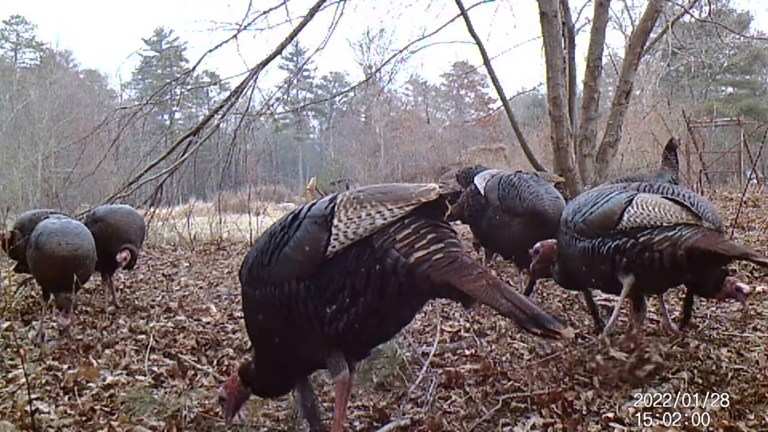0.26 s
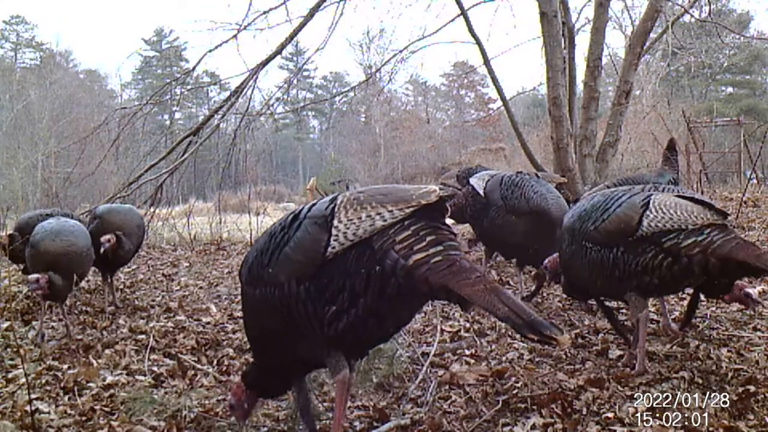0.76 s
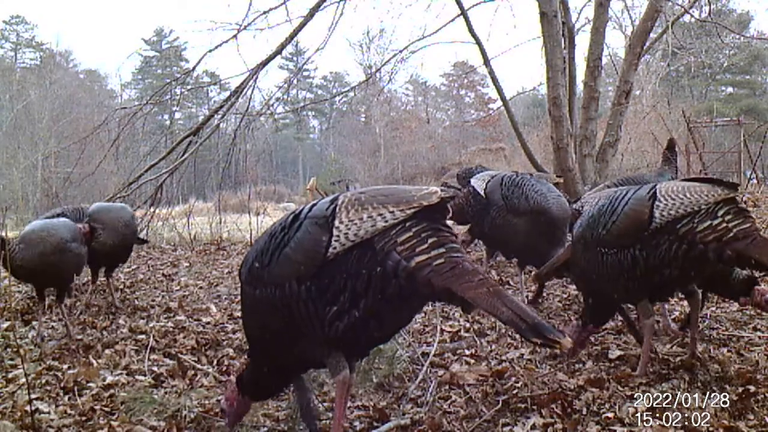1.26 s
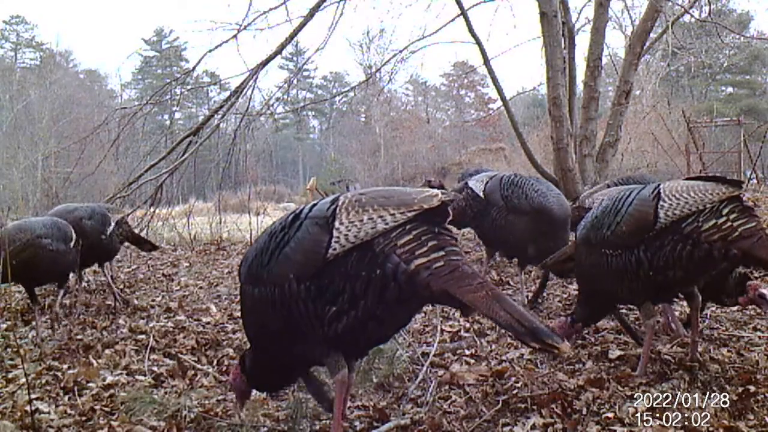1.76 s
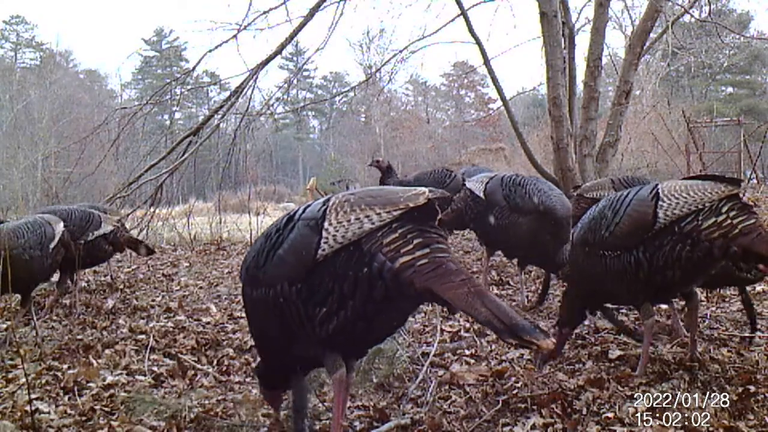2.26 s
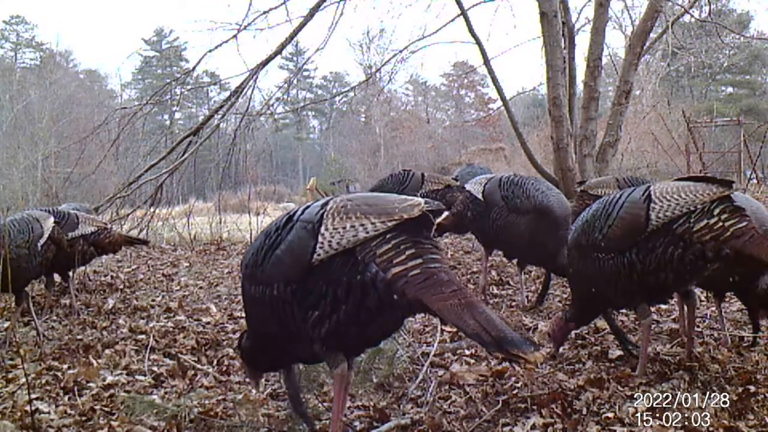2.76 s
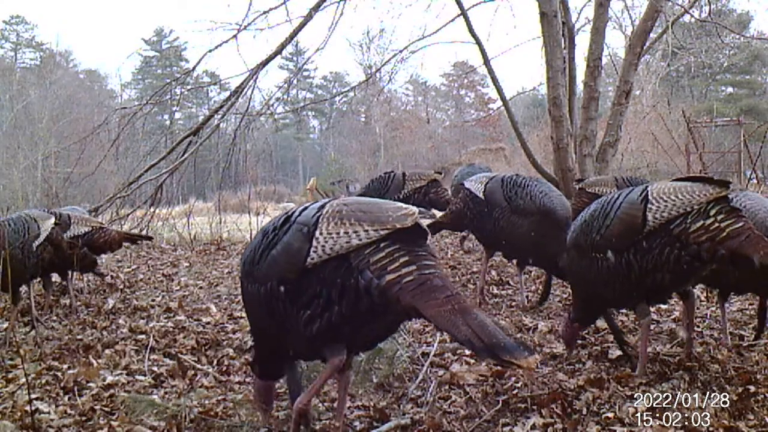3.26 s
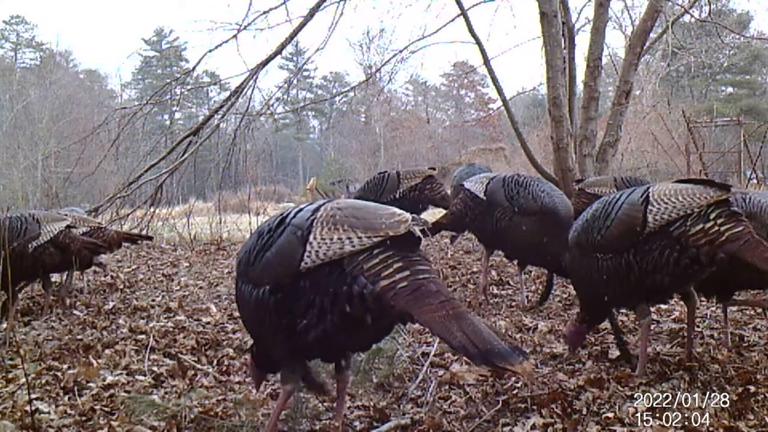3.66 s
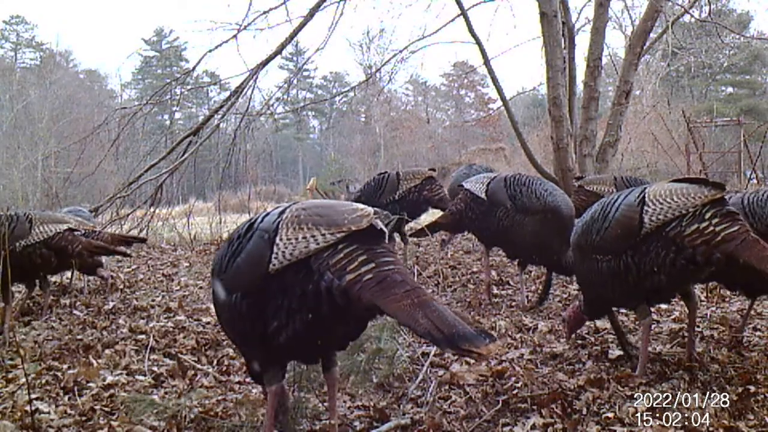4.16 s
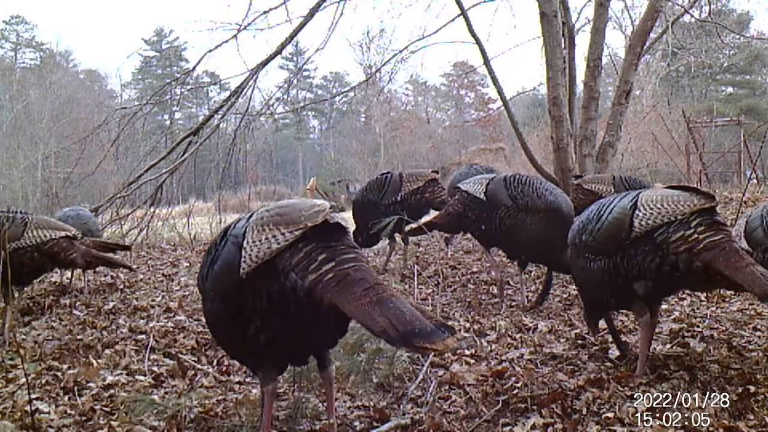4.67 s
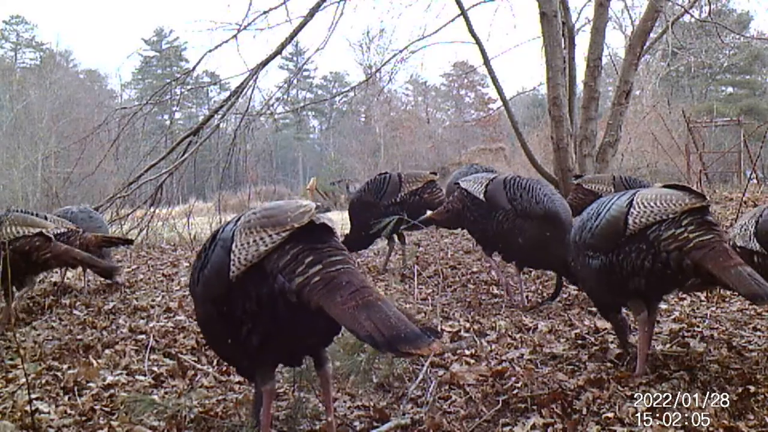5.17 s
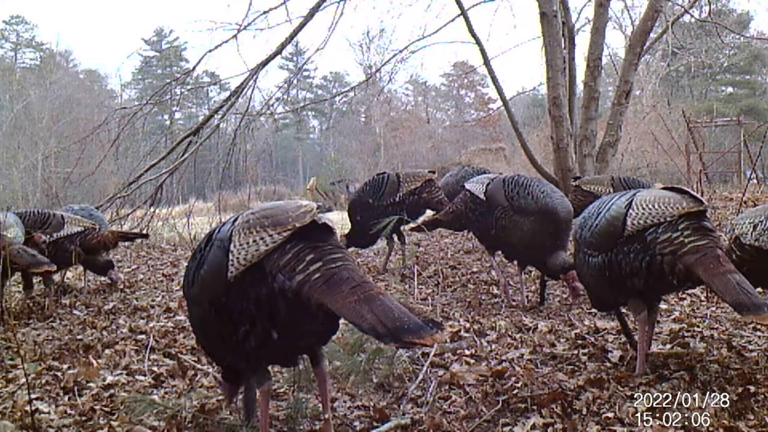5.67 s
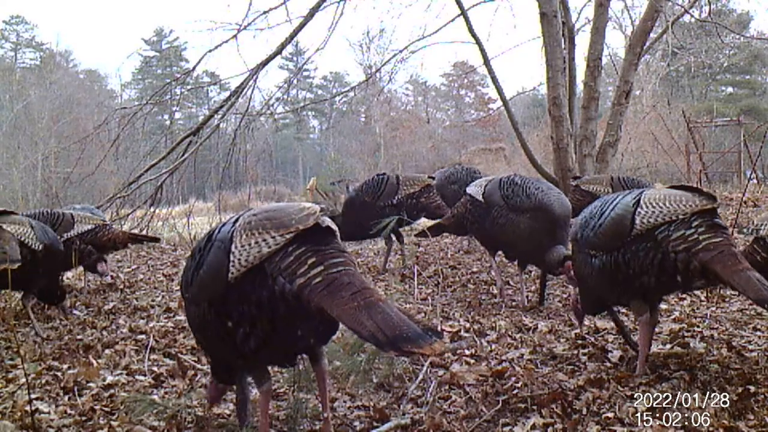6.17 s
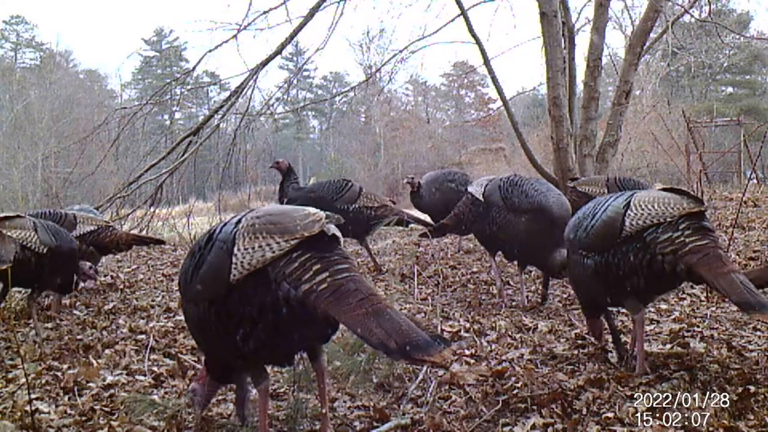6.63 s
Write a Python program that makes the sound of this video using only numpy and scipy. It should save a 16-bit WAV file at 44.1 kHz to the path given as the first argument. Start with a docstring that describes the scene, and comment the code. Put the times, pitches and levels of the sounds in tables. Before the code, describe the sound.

Wild turkeys rake and peck through dry leaves, crisp cracks and one sharp early snap over boomy rumble, hiss and faint whine.

```python
"""Wild turkeys scratch and peck in dry leaves near a small mono camera with a boomy, hissy microphone.
From the start, bursts of random cracks rake the litter; right away one ringing leaf snap overloads the camera.
Until about 2.5 s a low wavering tone booms now and then; rumble, hiss and faint whining tones run throughout.
At about four seconds a wide layer joins: faint hiss, then a hollow drone of resonated noise (the same in
both ears) and a narrow, whistling rustle of opposite sign in the two ears around a nasal centre."""
import sys
import numpy as np
from scipy import signal
from scipy.fft import rfft, irfft
from scipy.io import wavfile
from scipy.ndimage import uniform_filter1d

SR = 44100
rng = np.random.default_rng(int(sys.argv[2]) if len(sys.argv) > 2 else 0)


def bounce(signal):
    """Save signal as a 16-bit WAV file at the path given by the first command-line argument."""
    frames = np.transpose(np.atleast_2d(signal))
    limited = np.clip(frames, -1, 1)
    pcm = np.round(limited * 32767).astype(np.int16)
    wavfile.write(sys.argv[1], SR, pcm)


N = 304290

# faint steady electronic tones: f/Hz, level/dB
WHINE = [(8269, -101), (9647, -105), (11025, -91.5), (12403, -104)]
# colour of outdoor rumble and microphone hiss: f/Hz, relative level/dB
AIR_COLOUR = [(10, -9), (22, -5), (48, 3), (65, -1.5), (100, -2.5), (160, -7.5), (250, -14), (285, -15.5),
              (305, -10.5), (330, -16), (400, -20.5), (700, -22), (1200, -26), (2500, -34), (4700, -27.5),
              (5600, -46.5), (6300, -51)]
# slow swell of rumble and hiss: t/s, level/dB before AIR_LIFT_DB is added
AIR_SWELL = [(0.0, -41.5), (0.6, -43), (2.7, -44), (5.0, -42.5), (6.9, -42)]
# a low boom swells and fades: start t/s, hold t/s, f/Hz, level/dB
BOOM = [(0, 0.25, 86, -44), (.36, .05, 85, -36.5), (.48, 0.085, 83, -31), (.68, 0.17, 80, -46),
        (.93, .05, 84.7, -34.5), (1.15, .3, 85.4, -43), (1.65, .45, 92, -46.5), (2.22, .05, 85.4, -45),
        (2.5, .06, 94, -40)]
# hollow resonances of the drone: f/Hz, width f/Hz, relative level/dB
DRONE_MODES = [(551, 210, -3.5), (618.5, 122, 4), (694, 162, 4), (800, 340, -14)]
# the drone surges briefly: start t/s, hold t/s, level/dB
DRONE_SURGES = [(4.052, 0.011, -39), (4.76, 0.033, -45), (5.385, 0.012, -36), (5.445, .015, -42)]
# strokes of the wide rustle: start t/s, hold t/s, level of the sides/dB, level of the nasal centre/dB
WIDE_STROKES = [(4.48, 0.057, -52, -56), (4.775, 0.092, -49, -42.5), (5.08, 0.14, -40.5, -43.5),
                (5.3, 0.12, -45, -48), (5.5, 0.12, -39.5, -47), (5.83, .04, -38, -47),
                (6.17, .04, -55, -52), (6.35, 0.013, -57, -47), (6.49, 0.023, -41, -45.5),
                (6.6, 0.046, -46, -49.5), (6.81, 0.017, -43, -49)]
# loudest snaps of the wide rustle: t/s, peak level/dB
WIDE_SNAPS = [(4.127, -28), (4.345, -27.8), (4.667, -32), (4.795, -32), (5.233, -25), (5.493, -32),
              (5.528, -32), (5.667, -31), (5.82, -31.7), (5.873, -34), (5.961, -29.3), (6.205, -32),
              (6.265, -35), (6.274, -32), (6.308, -31), (6.562, -33), (6.814, -23)]
# narrow whistling colour of the sides: f/Hz, relative level/dB
WIDE_COLOUR = [(150, -58), (211, -34), (700, -28), (1180, -25), (1430, -25), (1860, -20), (2210, -19),
               (3520, -17.5), (4170, -8.5), (4450, -4), (4720, 4), (5000, -3.5), (5780, -17), (6150, -30),
               (8000, -60)]
# colour of the steady low wash in the sides: f/Hz, relative level/dB
WIDE_LOW_COLOUR = [(150, -40), (230, -7), (700, -1), (1200, 0.5), (1450, -12), (2000, -30)]
# nasal colour of the centre: f/Hz, relative level/dB
WIDE_CENTRE_COLOUR = [(1000, -16), (1350, -11.5), (1650, -6.5), (1950, 3.5), (2150, -9), (2500, -21),
                      (3000, -22)]
# feet raking the litter: start t/s, hold t/s, crisp level/dB, duller body against it/dB, dying away/dB per s
SCRATCHES = [(0.0, 0.061, -31, -0.5, 102), (0.047, 0.033, -22.5, -10, 106.5), (0.13, 0.035, -34, -15, 70.5),
             (0.316, 0.069, -35.5, -7, 100), (0.405, 0.074, -32, -9, 120), (.55, 0.09, -38, -9, 400),
             (0.717, 0.073, -42, -6.5, 98.5), (0.861, .17, -34.5, -9, 200), (1.128, 0.034, -40, -8.5, 100),
             (1.25, 0.03, -41.5, -9, 70), (1.443, 0.022, -43, -9, 298), (1.596, 0.21, -52.5, -12, 100),
             (1.904, 0.039, -41, -11, 70), (2.086, 0.11, -46, -8, 58), (2.308, 0.013, -43, -5, 498),
             (2.367, 0.034, -40.5, -6, 250), (2.6, 0.11, -49, -8, 58), (3.29, 0.046, -44.5, -6.5, 150),
             (3.722, 0.1, -47, -13, 60), (4.037, 0.19, -45, -8, 30), (4.332, .02, -44, -7, 80),
             (4.474, 0.044, -41.5, -8, 60), (4.783, 0.15, -35, -9, 150), (5.0, .15, -40.5, -9, 100),
             (5.189, .1, -34, -11.5, 60), (5.493, 0.085, -35, -9.5, 55), (5.817, .08, -40.5, -11.5, 50),
             (6.145, .08, -38.5, -10.5, 35), (6.494, 0.032, -38, -6.5, 200), (6.56, 0.29, -45, -6.5, 16)]
# crisp top of the leaves: f/Hz, relative level/dB
CRISP_COLOUR = [(2200, -21.5), (2900, -6.5), (3500, -2), (4200, 0), (4900, 5), (5400, -1), (5800, -10.5),
                (6300, -37.5)]
# duller body of the raked litter: f/Hz, relative level/dB
RAKE_BODY_COLOUR = [(500, -8), (900, -21.5), (1300, -4.5), (1600, -5), (2000, -1.5), (2400, 0),
                    (2900, -4.5), (3600, -37)]
# duller body of single breaks: f/Hz, relative level/dB
SNAP_BODY_COLOUR = [(300, -24), (600, -3.5), (1000, -4.5), (1600, 1.5), (2200, -6.5), (2900, -11),
                    (3600, -25.5)]
# single leaves breaking: t/s, peak level/dB, body against the peak/dB, ring f/Hz
SNAPS = [(.0197, -10.5, -16, 4320), (.0549, -19, -9, 4800), (.0889, -13, -9, 4260), (.1006, -17, -26, 5000),
         (.124, -16.5, -9.5, 4690), (.15, -18, -13, 4130), (.2133, -30, -25, 4220),
         (.3286, -20.5, -22, 4690), (.339, -27, -20, 4350), (.362, -23, -16, 4590),
         (0.4695, -19, -23, 4240), (0.6246, -24, -27, 5040), (0.6405, -25, -10, 4800),
         (.7366, -26, -10, 4240), (.768, -26, -15, 4800), (.8254, -22, -32, 4960), (.858, -25, -20, 4600),
         (.9144, -24, -20, 4480), (1.1845, -30, 2, 4220), (1.3546, -27, -25, 4520), (1.456, -25, -21, 4440),
         (1.465, -33, -14, 4130), (1.53, -32, 3, 4750), (1.5364, -22.5, -30, 4200),
         (1.6366, -33, -13, 4800), (1.81, -28, -6, 5040), (1.8157, -29.5, -1, 4350),
         (1.879, -33, -17, 5020), (1.9238, -26, -14, 5080), (1.9935, -27, -11, 4960),
         (2.1188, -24, -26, 4600), (2.171, -30, -14, 5060), (2.23, -24, -13, 5000), (2.2394, -26, -8, 4130),
         (2.3206, -22, -13, 4930), (2.3556, -22, -17, 4500), (2.397, -21, -23, 4750),
         (2.4136, -23, -21, 4110), (2.4552, -36, -1, 3270), (2.5136, -22, -10, 4350),
         (2.5192, -22.5, -4.5, 4710), (2.6233, -30, -18, 4220), (2.6434, -27, -27, 4670),
         (2.8209, -30.5, -28, 4670), (2.85, -26.5, 0, 4650), (2.8573, -33, -2, 4690),
         (2.9664, -32, -6, 4570), (3.0354, -30, -6, 4290), (3.0836, -31, -26, 5040),
         (3.1006, -28, -25, 5200), (3.183, -30, -19, 4500), (3.358, -29, -9, 4910),
         (3.4834, -25, -25, 4590), (3.5138, -29.5, -3.5, 5210), (3.54, -23.5, -32, 4680),
         (3.5514, -25, -24, 5230), (3.635, -30, -18, 4800), (3.7506, -31.5, -23, 3700),
         (3.8094, -30, -8, 4760), (3.8165, -26.5, -10, 5040), (3.918, -29, -10, 4630),
         (4.022, -26, -21, 4660), (4.0346, -20.5, -27, 4480), (4.09, -31, -11, 4860),
         (4.1268, -27.5, -17, 5100), (4.3453, -30.5, -18, 5020), (4.4815, -29, -25, 5000),
         (4.8907, -25, -32, 5100), (5.1804, -26, -20, 4570), (5.2155, -27, -27, 4780),
         (5.2746, -17.5, -23, 4260), (5.335, -27, -8, 5000), (5.5352, -20.5, -17, 5170),
         (5.5642, -22, -13, 5000), (5.65, -24, -17, 4740), (5.8137, -26, -30, 4570),
         (5.843, -24.5, -15, 5000), (5.874, -26, -12, 5000), (5.9533, -27, -23, 4280),
         (5.997, -27.5, -20, 4740), (6.5025, -18, -15, 4650), (6.5068, -16, -25, 4330),
         (6.818, -24.5, -6, 4360)]
# the loudest break of all: t/s, level/dB
LOUDEST_BREAK = (.04862, -6.5)
# what the loudest break rings with: f/Hz, relative level/dB, t/s to fall by 60 dB
LOUDEST_MODES = [(1990, -9, .014), (2970, -11, .014), (4270, 0, .022), (5050, -2, .018)]

HISS_FROM_S, HISS_DB = 3.968, -61
AIR_LIFT_DB = 5
BOOM_RISE_DB_PER_S, BOOM_FALL_DB_PER_S, BOOM_WAVER_HZ = 196.5, 150, 2.4
DRONE_DB, DRONE_WAVER_DB = -44, 0.9
WIDE_FROM_S = 4.052  # drone and wide rustle begin
STROKE_RISE_DB_PER_S, SIDE_FALL_DB_PER_S, CENTRE_FALL_DB_PER_S = 302, 86, 134
SIDE_REST_DB, CENTRE_REST_DB = -48, -61.5  # between strokes
WIDE_SMALL_PER_S, WIDE_SMALL_DB = 9, -36  # lesser snaps: rate, middle peak level
WIDE_LOW_DB = -63.5
RAKE_RISE_DB_PER_S = 348.5
SHUFFLE_DB, SHUFFLE_BODY_DB = -49, -6.5  # the flock never stands quite still; body against crisp
SNAP_HZ, SNAP_SPREAD_HZ, SNAP_T60_S = 4800, 350, 0.013  # T60: time to fall by 60 dB
# lesser breaks: rate, level above the raking, its spread, body against the peak
SMALL_PER_S, SMALL_DB, SMALL_SPREAD_DB, SMALL_BODY_DB = 14, 9, 2.2, -17.5
TREBLE_LIMIT_HZ, FINAL_LIMIT_HZ = 6240, 13150
OVERLOAD, OFFSET = .64, .0612  # amplitudes; the offset comes after the overload


def gain_of(db):
    """Turns decibels into a plain multiplier."""
    return 10 ** (np.asarray(db) / 20)


def evened(x):
    """Scales a sound to an average (rms) strength of 1."""
    return x / np.sqrt(np.mean(x ** 2) + 1e-20)


def curve(rows, column=1):
    """Draws straight lines between the points in one column of a table, sample by sample."""
    return np.interp(np.arange(N) / SR, [r[0] for r in rows], [r[column] for r in rows])


def after(s):
    """Silent before s, fully open 2 ms later."""
    return np.clip((np.arange(N) / SR - s) * 500, 0, 1)


def swells(rows, rise, fall, rest_db, column=2):
    """Gain of overlapping gestures: each rises, holds and dies away; powers add over a resting level."""
    t = np.arange(0, N, 32) / SR
    power = gain_of(rest_db) ** 2
    for row, dying in zip(rows, fall * np.ones(len(rows))):
        start, hold = row[0], row[1]
        below_db = rise * np.maximum(start - t, 0) + dying * np.maximum(t - start - hold, 0)
        power = power + gain_of(row[column] - below_db) ** 2
    return np.interp(np.arange(N) / SR, t, np.sqrt(power))


def response(points, size=4096):
    """Makes a filter of energy 1 from a colour table, reacting as early as possible (minimum phase)."""
    f, db = np.transpose(points)
    hz = abs(np.fft.fftfreq(size, 1 / SR)) + 1
    log_gain = np.log(gain_of(np.interp(np.log(hz), np.log(f), np.maximum(db, -70))))
    spectrum = np.exp(np.conj(signal.hilbert(log_gain)))
    taps = np.fft.ifft(spectrum).real[:size // 2]
    return taps / np.linalg.norm(taps)


def coloured(x, points, size=4096):
    """Filters a sound to the colour in a table."""
    return signal.oaconvolve(x, response(points, size=size))[:N]


def low_pass(x, hz, size):
    """Removes what lies above hz, with a longer filter cutting more sharply."""
    taps = signal.firwin(size, hz, window=("kaiser", 10), fs=SR)
    return signal.oaconvolve(x, taps.reshape((1,) * (x.ndim - 1) + (-1,)), "same")


def resonate(x, hz, width):
    """Rings at hz: shifts that pitch down to zero, smooths, and shifts back."""
    turn = np.exp(2j * np.pi * np.cumsum(hz * np.ones(N)) / SR)
    r = np.exp(-np.pi * width / SR)
    return 2 * (turn * signal.lfilter([1 - r], [1, -r], x / turn)).real


def ring(hz, t60):
    """A tone that dies by 60 dB in t60 seconds, cut off after 1200 samples."""
    t = np.arange(1200) / SR
    return gain_of(-60 * t / t60) * np.sin(2 * np.pi * hz * t)


def crackle_bursts(per_s, spread_db, t60):
    """Strength over time of cracks of uneven size, struck at random and dying away."""
    size = gain_of(spread_db * np.minimum(rng.exponential(1, N), 4))
    struck = size * (rng.random(N) < per_s / SR)
    return evened(signal.lfilter([1], [1, -gain_of(-60 / (t60 * SR))], struck))


def crackle(per_s, spread_db, t60, smooth, shared, count=5):
    """Countless leaf cracks over a blur of far ones; each crack fills one band, some fill all."""
    octaves = np.log2(np.fft.rfftfreq(N, 1 / SR) / 1000 + 1e-9)
    place = np.clip(octaves * 1.618, 0, count - 1)
    broad = crackle_bursts(per_s, spread_db, t60)
    total = 0
    for k in range(count):
        band = np.cos(np.pi / 2 * np.clip(place - k, -1, 1))  # neighbours overlap, squares sum to 1
        strength = crackle_bursts(per_s, spread_db, t60) + shared * broad + smooth
        total = total + band * rfft(strength * rng.standard_normal(N))
    return evened(irfft(total, N))


def snap(s, peak_db, t60, taps, tick, rise_s):
    """One break: a tick and a spray of splinters that builds up quickly and dies."""
    t = np.arange(1200) / SR
    spray = rng.standard_normal(1200) * gain_of(-60 * t / t60) * (1 - np.exp(-t / rise_s))
    spray[round(rise_s * SR)] = tick
    sound = signal.fftconvolve(spray, taps)
    return round(s * SR), gain_of(peak_db) * sound / abs(sound).max()


def scattered(per_s, from_s=0):
    """Rows of chance for the lesser breaks: time, and three normal numbers."""
    times = from_s + np.cumsum(rng.exponential(1, (400, 1)), 0) / per_s
    return np.hstack([times, rng.standard_normal((400, 3))])[times[:, 0] < N / SR]


def add(mix, at, sound):
    """Adds a short sound to the mix, starting at a sample number."""
    part = mix[at:][:len(sound)]
    part += sound[:len(part)]


def electronics():
    """Faint steady tones, and the wide layer's hiss, unrelated left and right and without bass."""
    t = np.arange(N) / SR
    whine = sum(np.sqrt(2) * gain_of(db) * np.sin(2 * np.pi * hz * t) for hz, db in WHINE)
    hiss = rng.standard_normal((2, N))
    hiss -= low_pass(hiss, 170, size=1501)
    return whine + gain_of(HISS_DB) * after(HISS_FROM_S) * hiss


def air():
    """Outdoor rumble and microphone hiss: coloured noise with a slowly changing level."""
    noise = coloured(rng.standard_normal(N), AIR_COLOUR, size=16384)
    return gain_of(curve(AIR_SWELL) + AIR_LIFT_DB) * noise


def boom():
    """A low tone whose pitch glides and wavers while its level swells and fades."""
    waver = evened(uniform_filter1d(rng.standard_normal(N), 3000))
    hz = curve(BOOM, column=2) + BOOM_WAVER_HZ * waver
    tone = np.sqrt(2) * np.sin(2 * np.pi * np.cumsum(hz) / SR)
    return tone * swells(BOOM, BOOM_RISE_DB_PER_S, BOOM_FALL_DB_PER_S, -80, column=3)


def drone():
    """Wavering noise sent twice through each hollow resonance, with brief surges."""
    waver = evened(uniform_filter1d(rng.standard_normal(N), 1500))
    breathy = rng.standard_normal(N) * gain_of(DRONE_WAVER_DB * waver)
    hollow = 0
    for hz, width, db in DRONE_MODES:
        hollow = hollow + gain_of(db) * resonate(resonate(breathy, hz, width), hz, width)
    level = swells(DRONE_SURGES, 600, 370, DRONE_DB) * after(WIDE_FROM_S)
    return level * evened(hollow)


def wide_rustle():
    """Cracks through one narrow resonance, of opposite sign in the ears, around a centred nasal body."""
    opening = after(WIDE_FROM_S)
    side_level = swells(WIDE_STROKES, STROKE_RISE_DB_PER_S, SIDE_FALL_DB_PER_S, SIDE_REST_DB)
    centre_level = swells(WIDE_STROKES, STROKE_RISE_DB_PER_S, CENTRE_FALL_DB_PER_S, CENTRE_REST_DB, column=3)
    side = side_level * opening * coloured(crackle(600, 3.0, 0.0057, 1.0, .3), WIDE_COLOUR)
    side += gain_of(WIDE_LOW_DB) * opening * coloured(rng.standard_normal(N), WIDE_LOW_COLOUR)
    centre = centre_level * opening * coloured(crackle(540, 1.7, 0.015, 1.3, 0.26), WIDE_CENTRE_COLOUR)
    taps = response(WIDE_COLOUR, size=2048) + 0.07 * ring(4500, .012)[:1024]
    small = [(s, WIDE_SMALL_DB + 2.2 * a) for s, a, *_ in scattered(WIDE_SMALL_PER_S, WIDE_FROM_S)]
    for s, peak_db in [*WIDE_SNAPS, *small]:
        add(side, *snap(s, peak_db, .015, taps, 2.2, .0005))
    return low_pass(np.array([centre + side, centre - side]), TREBLE_LIMIT_HZ, size=301)


def raking(crisp_level):
    """Feet rake the litter: the same cracks feed its crisp top and its duller body."""
    cracks = crackle(900, 3.5, 0.0054, 0.83, 0.45)
    dull = [(s, hold, db + body_db) for s, hold, db, body_db, _ in SCRATCHES]
    dying = np.array(SCRATCHES)[:, -1]
    body_level = swells(dull, RAKE_RISE_DB_PER_S, dying, SHUFFLE_DB + SHUFFLE_BODY_DB)
    return crisp_level * coloured(cracks, CRISP_COLOUR) + body_level * coloured(cracks, RAKE_BODY_COLOUR)


def lesser_breaks(crisp_level):
    """Rows for small breaks at random times, each louder when the raking is louder."""
    rows = []
    for s, a, b, c in scattered(SMALL_PER_S):
        raking_db = 20 * np.log10(crisp_level[int(s * SR)])
        peak_db = raking_db + SMALL_DB + SMALL_SPREAD_DB * a
        rows.append((s, peak_db, SMALL_BODY_DB + 4.1 * b, SNAP_HZ + SNAP_SPREAD_HZ * c))
    return rows


def loudest_break():
    """The overloading leaf snap: a few dying tones started together."""
    modes = sum(gain_of(db) * ring(hz, t60) for hz, db, t60 in LOUDEST_MODES)
    return round(LOUDEST_BREAK[0] * SR), gain_of(LOUDEST_BREAK[1]) * modes


def leaves():
    """Raked litter with single leaves breaking, each a crisp ringing snap plus a duller body."""
    dying = np.array(SCRATCHES)[:, -1]
    crisp_level = swells(SCRATCHES, RAKE_RISE_DB_PER_S, dying, SHUFFLE_DB)
    out = raking(crisp_level)
    crisp_taps = response(CRISP_COLOUR, size=1024)
    body_taps = response(SNAP_BODY_COLOUR, size=1024)
    for s, peak_db, body_db, hz in [*SNAPS, *lesser_breaks(crisp_level)]:
        ringing = np.convolve(ring(hz, 0.023), crisp_taps)[:len(crisp_taps)]
        add(out, *snap(s, peak_db, SNAP_T60_S, crisp_taps + 0.024 * ringing, 3.5, .0004))
        add(out, *snap(s, peak_db + body_db, 1.3 * SNAP_T60_S, body_taps, 3.9, .0006))
    add(out, *loudest_break())
    return out


def scene():
    """Overloads the mono camera sound on its upper side only, then adds the stereo layers."""
    camera = low_pass(air() + boom() + drone() + leaves(), TREBLE_LIMIT_HZ, size=801)
    camera = np.minimum(camera, OVERLOAD)  # the first swing of the loudest break hits the rail
    return camera + wide_rustle() + electronics()


def record(dry):
    """Limits the treble and adds the steady offset of the converter."""
    return low_pass(dry, FINAL_LIMIT_HZ, size=401) + OFFSET


dry = scene()
out = record(dry)
bounce(out)
```